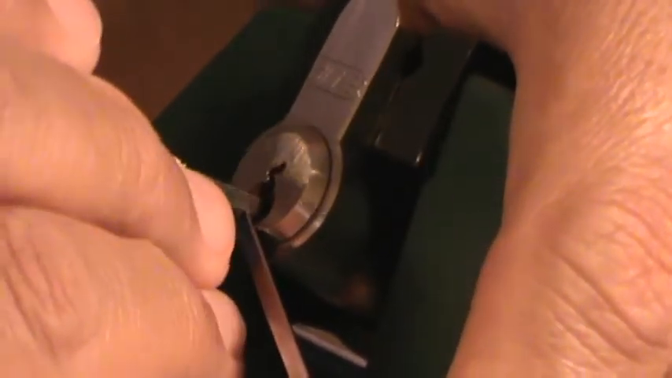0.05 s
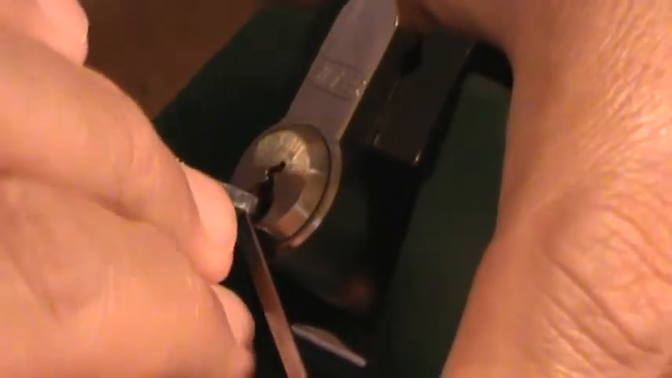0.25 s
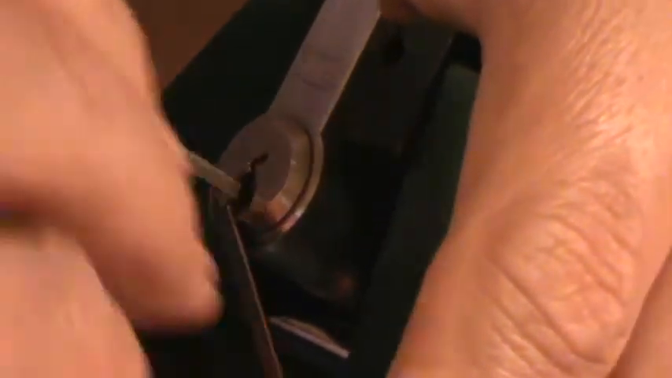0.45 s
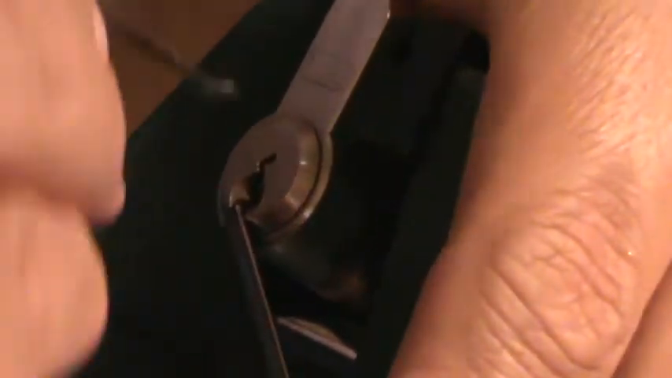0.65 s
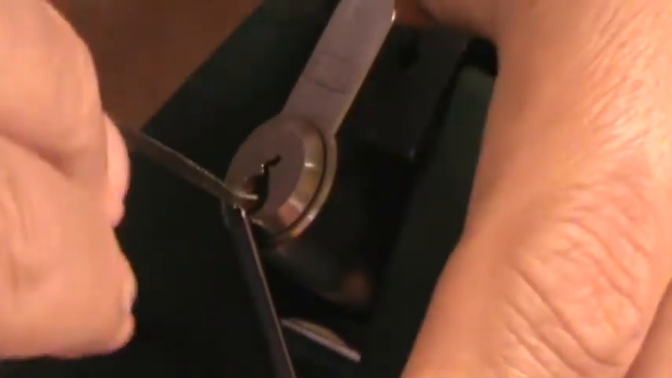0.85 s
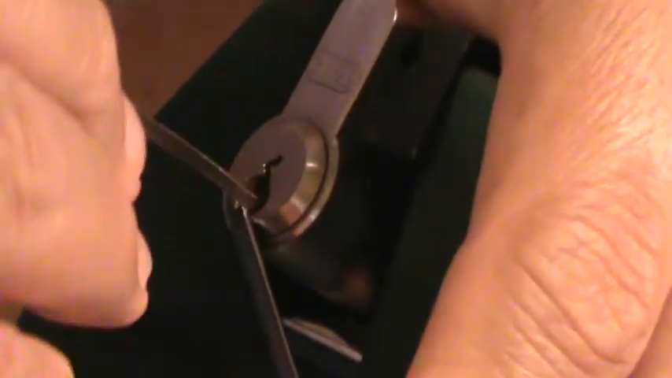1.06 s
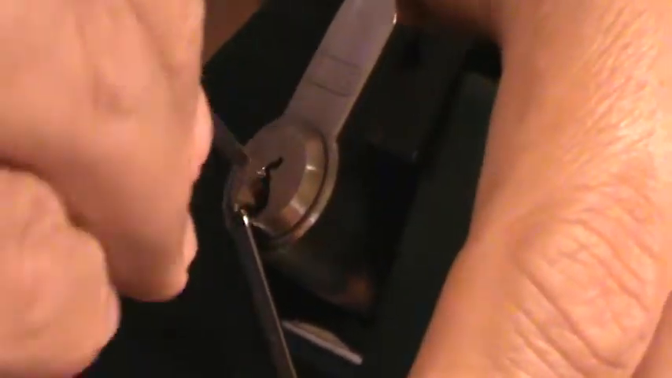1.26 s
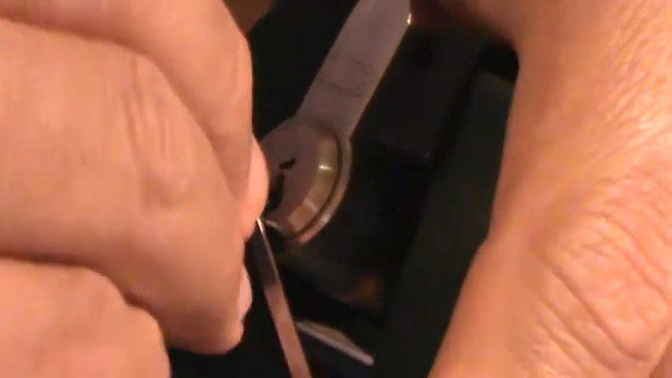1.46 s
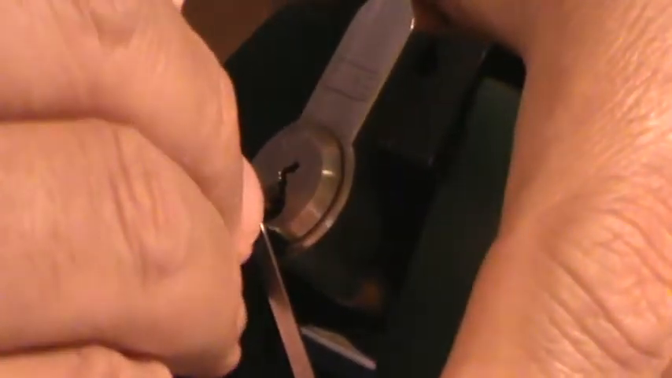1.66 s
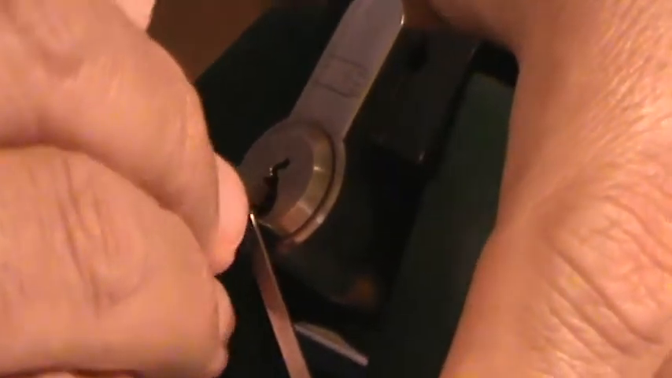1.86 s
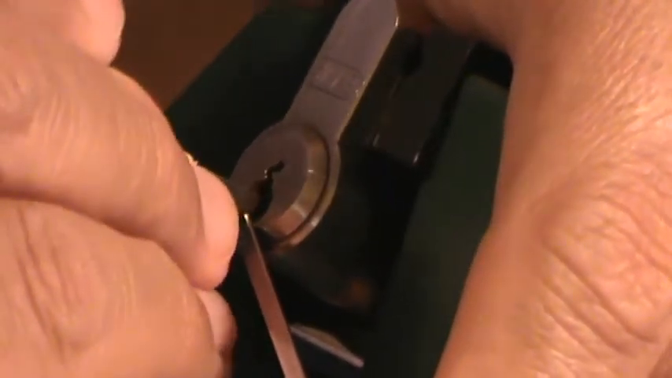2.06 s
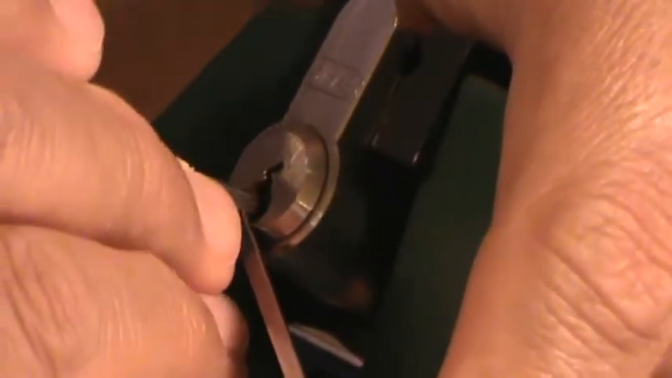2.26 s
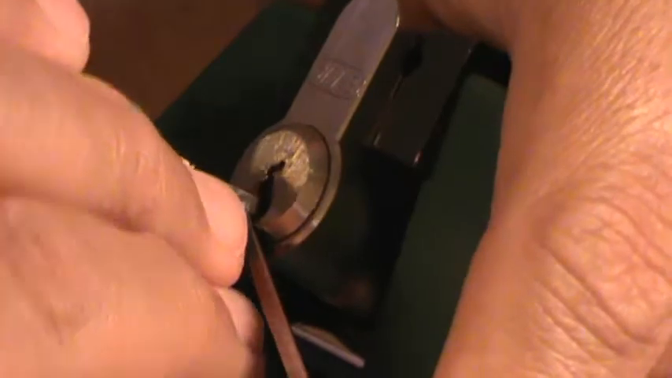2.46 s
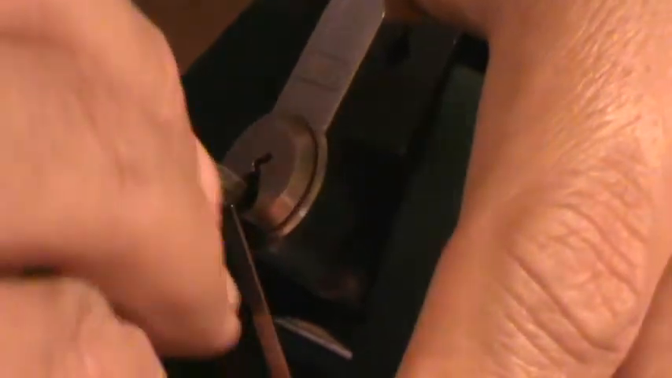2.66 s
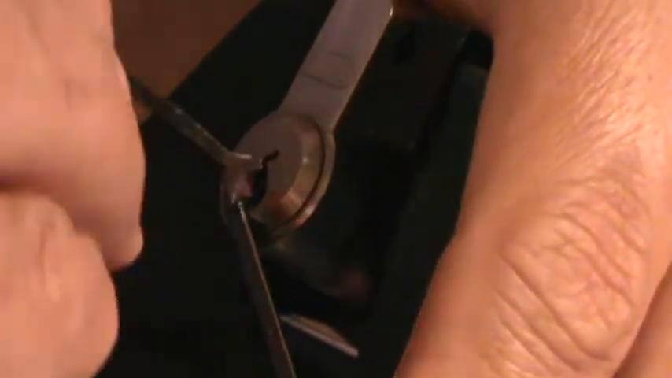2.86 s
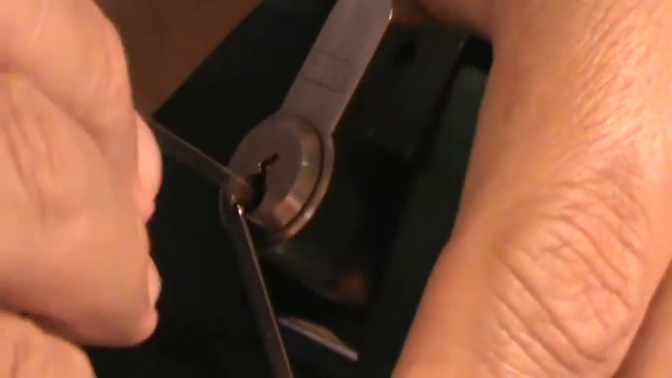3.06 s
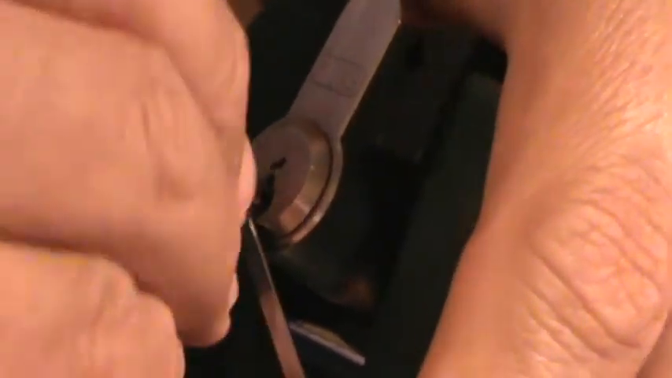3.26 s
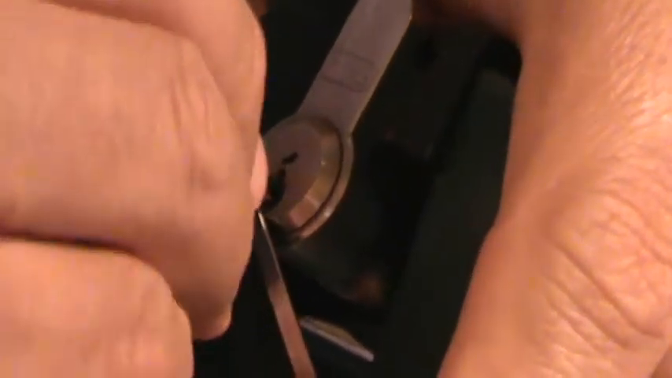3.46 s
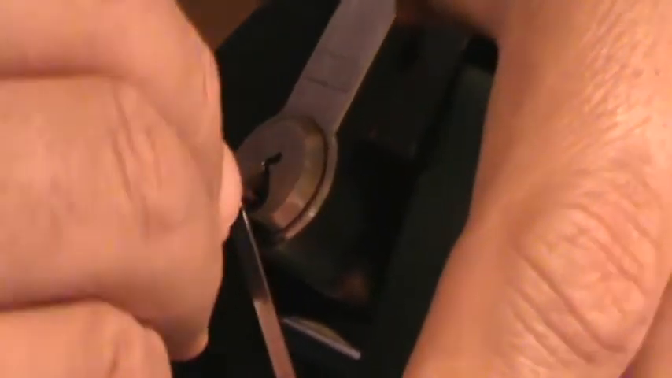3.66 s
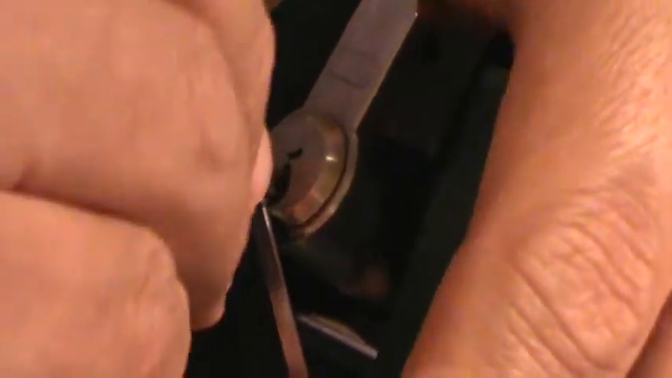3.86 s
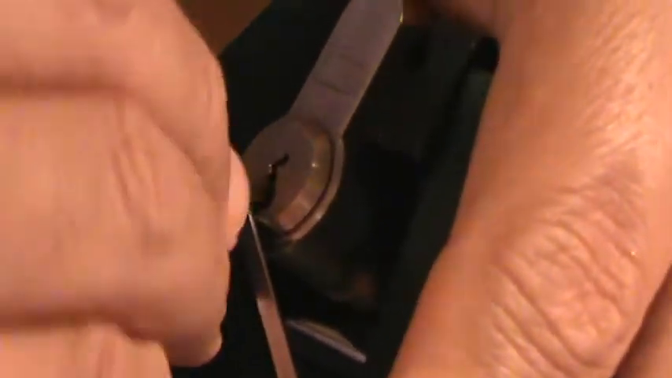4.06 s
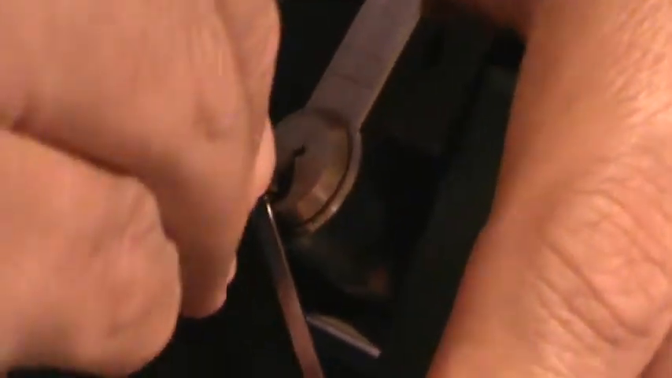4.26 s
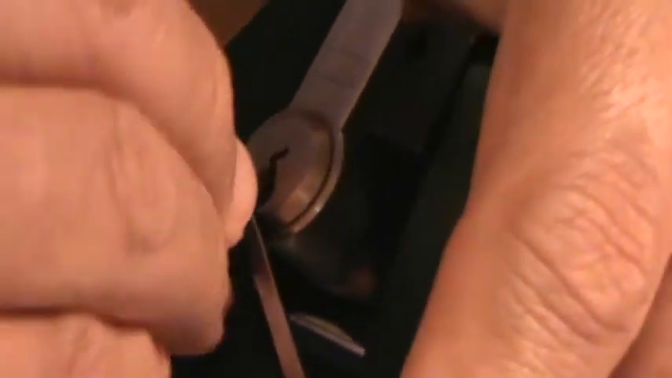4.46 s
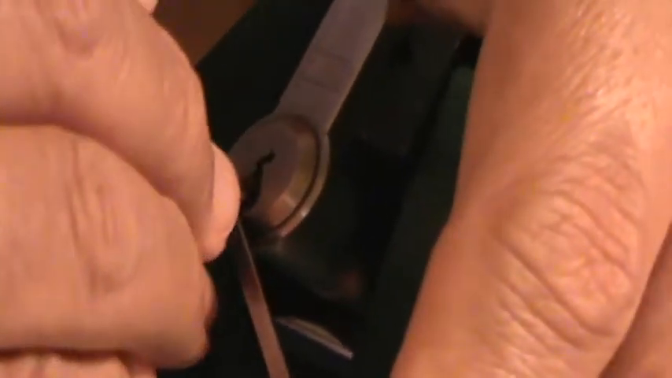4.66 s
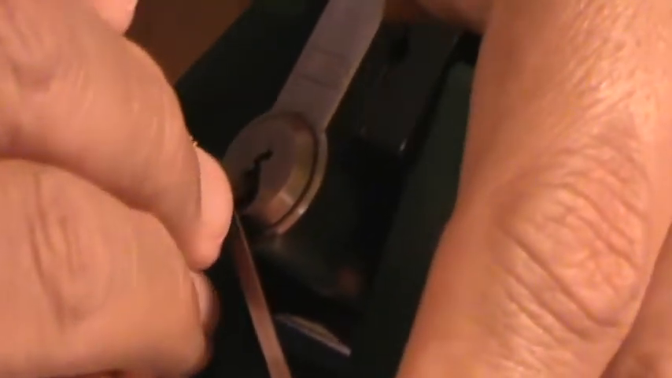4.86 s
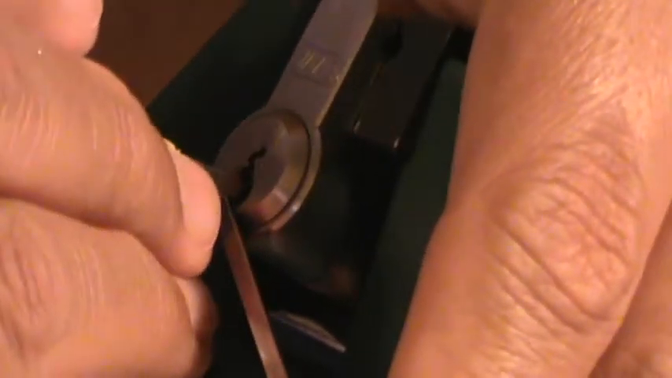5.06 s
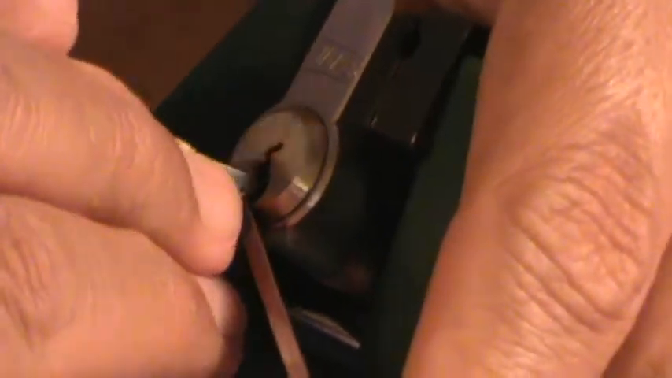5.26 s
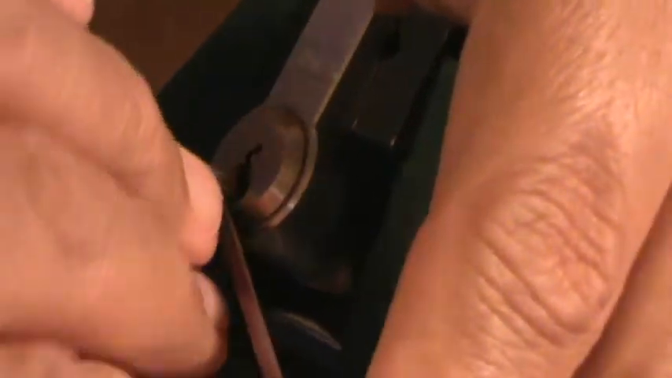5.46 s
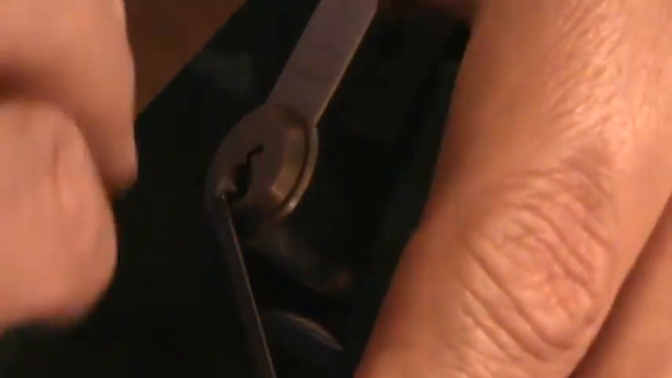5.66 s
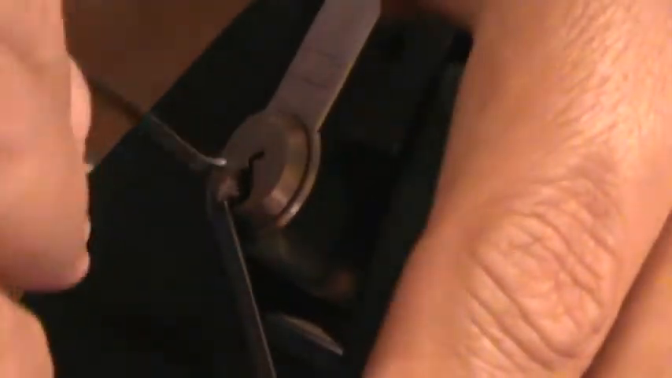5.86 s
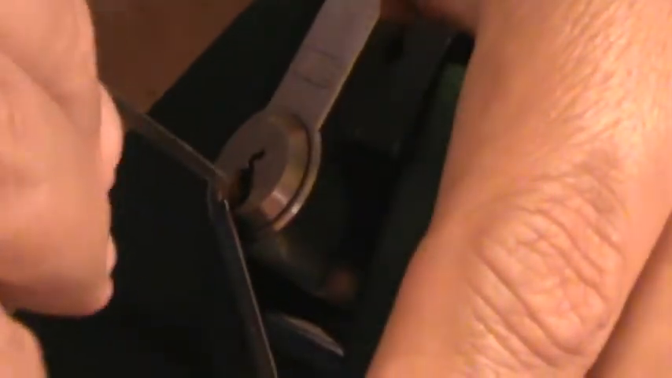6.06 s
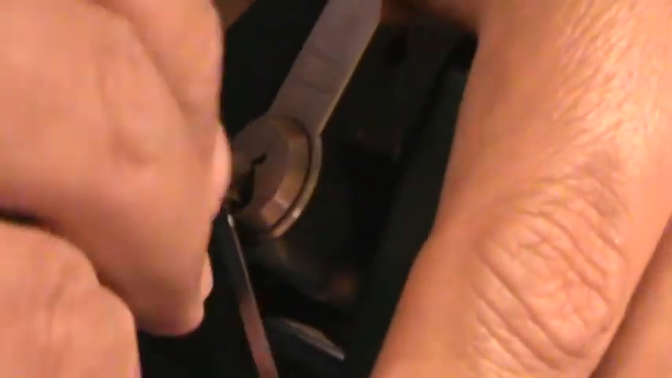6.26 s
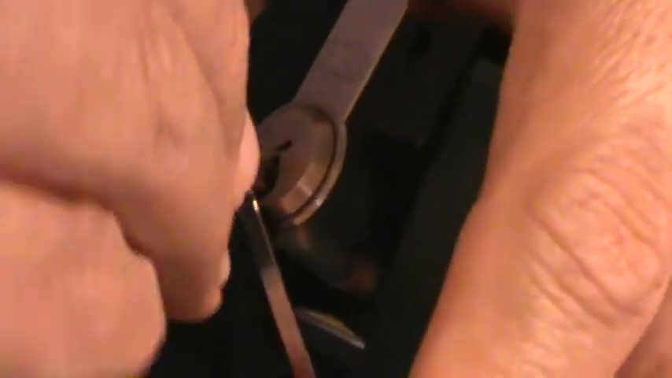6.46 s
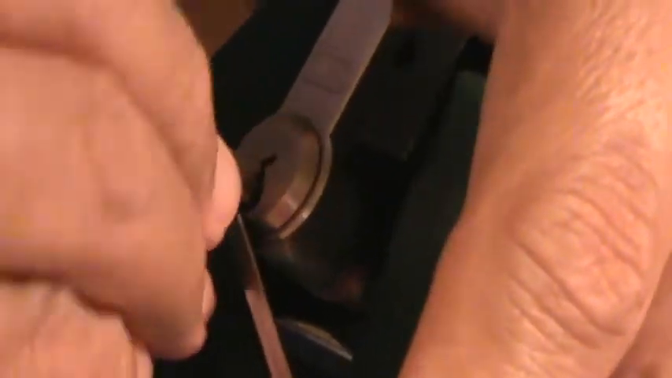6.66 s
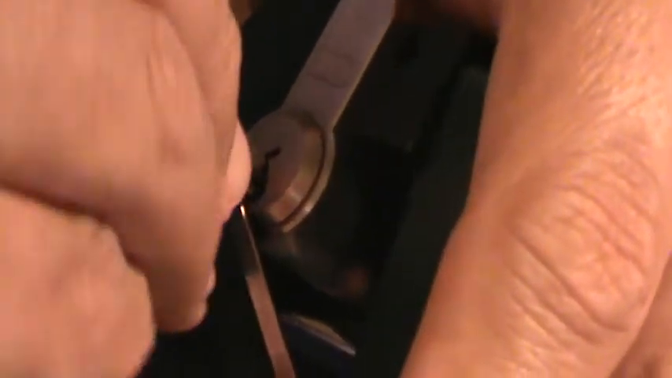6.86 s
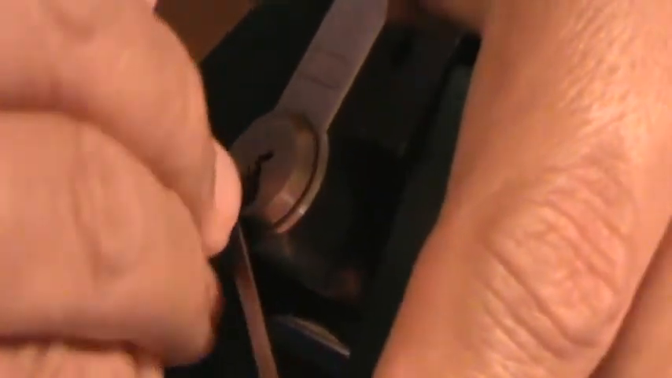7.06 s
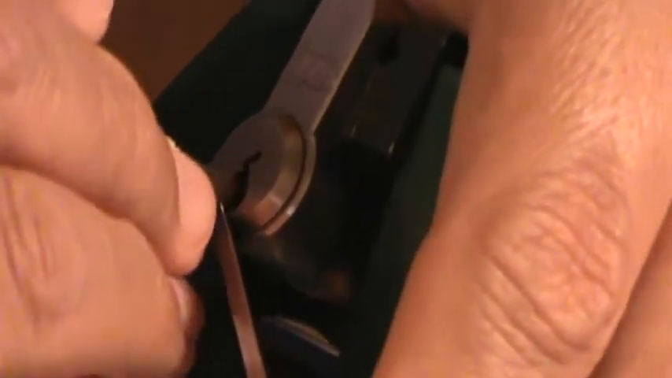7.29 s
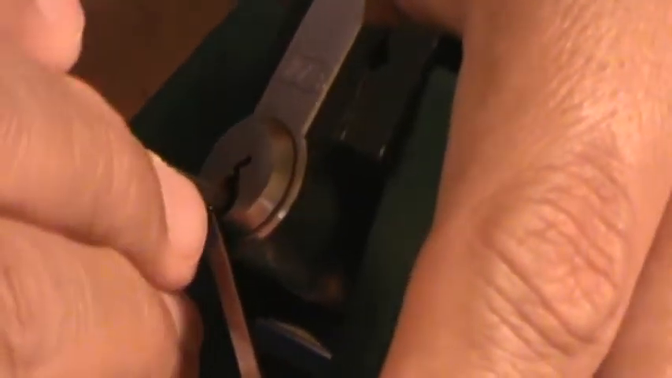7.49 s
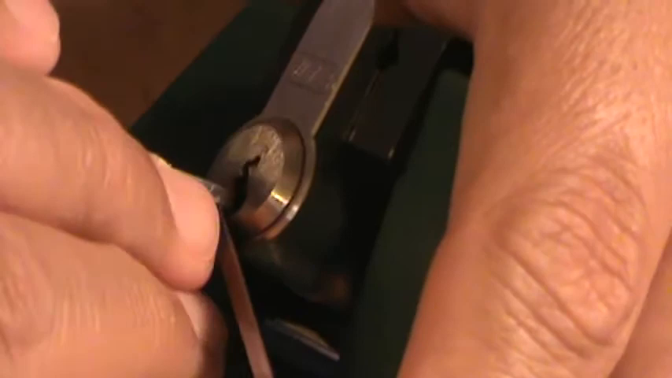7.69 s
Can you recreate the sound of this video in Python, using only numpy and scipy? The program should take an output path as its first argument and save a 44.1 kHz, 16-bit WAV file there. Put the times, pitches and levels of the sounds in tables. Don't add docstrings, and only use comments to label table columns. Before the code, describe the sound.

Tiny bright pin ticks, scratchy steel clicks and soft nudges come in irregular clusters between four sharp wrench snaps. The snaps jangle briefly and leave a short beating metallic ring, except the second, where the vice barely answers. A very brief squeak comes midway. Behind are mains hum, a distant engine drone that swells and fades, and steady microphone hiss in a small room.

```python
import sys
import numpy as np
from scipy import signal
from scipy.fft import rfft, irfft, next_fast_len
from scipy.io import wavfile
from scipy.ndimage import uniform_filter1d, map_coordinates

SR = 44100
rng = np.random.default_rng(int(sys.argv[2]) if len(sys.argv) > 2 else 0)


def to_wav(s):
    ch = np.atleast_2d(s).T
    pcm = np.round(np.clip(ch, -1, 1) * 32767)
    wavfile.write(sys.argv[1], SR, pcm.astype(np.int16))


def voltage_ratio(decibels):
    exponent = np.asarray(decibels, float) / 20
    return 10 ** exponent


N = 340893
CONTACT_SAMPLES = 12288

# (centre [Hz], width [Hz], level [dB])
PIN_MODES = [(6500, 190, 6.5), (8560, 3500, -9), (8500, 510, 11.5), (8900, 1200, 3), (10000, 990, 11),
             (11000, 250, 6), (11700, 720, 11), (13650, 610, 8), (13300, 820, 2), (10500, 5600, 5)]
TOOL_MODES = [(2640, 360, 3.5), (3864, 220, 4), (4050, 790, 7.5), (5100, 63, -29), (6260, 320, 2.5),
              (3910, 2570, 5)]
VICE_MODES = [(530, 88, -12.5), (648, 80, -3.5), (820, 115, -8), (1070, 56, -3), (1280, 360, -4.5),
              (1402, 337, -3.5), (1660, 100, -13), (1792, 36, 2.5), (1969, 54, 0.5), (2230, 270, -12.5)]
# (level [dB], t60 [s], colour blur [Hz])
DIFFUSE_TAILS = [(-9.5, 0.29, 3300), (-8, 0.36, 2500), (-5, 0.4, 120)]
PART_LAGS_S = [0, 0.000229, 0.001223]
# (centre [Hz], t60 [s], gap [Hz], partner share [0-1], level re blow [dB])
VICE_RING = [(1061, 0.2, 14, 0.4, -13.5), (1462, 0.24, 15.4, 1, -16.5), (1690, 0.19, 17, .99, -33),
             (1772, 0.24, 22.2, 1, -16.5), (2065, 0.091, 24, 0.7, -7)]

# (time [s], pins [dB], vice [dB], brightest pin [Hz], tools [dB])
WRENCH_SNAPS = [
    (0.05, -14.5, -21.5, 8500, -17),
    (2.257, -17, -39.5, 10800, -26),
    (5.224, -16, -21, 10500, -19.5),
    (7.6346, -17.5, -18.5, 13000, -21.5),
]
# (time [s], pins [dB], tools [dB], vice [dB], brightest tool [Hz])
PIN_SETS = [
    (2.4031, -38.5, -36, -42, 3270),
    (0.474, -31, -34, -39.5, 3550),
    (3.224, -38, -37, -38.5, 4060),
    (3.2545, -39.5, -37, -52, 4220),
    (3.3553, -27, -26, -39.5, 5100),
    (5.5725, -33.5, -36, -49, 3820),
    (6.504, -23.5, -29, -37, 5770),
]
# (time [s],
# pins [dB], vice [dB], brightest pin [Hz], after-rattle [dB])
TAPS = [(0.0968, -39, -42, 11200, 2), (2.2734, -36, -44.5, 11400, 10),
        (7.6383, -30, -19.5, 12000, -5), (5.2435, -32, -44, 11200, -10),
        (5.2476, -36, -38, 11800, -3), (5.2565, -37.5, -33.5, 10000, 6.5),
        (7.6615, -37, -40, 11300, -2), (7.681, -47.5, -46, 9900, -6),
        (7.6911, -20.5, -57, 7000, -13), (7.7003, -31, -46, 10600, -4), (7.718, -39, -49, 11500, -6),
        (7.7277, -38, -42, 11600, -6)]
# (time [s], pins [dB], vice [dB], brightest pin [Hz], brightest tool [Hz])
PICK_CLICKS = [(0.4543, -32, -43, 7000, 6160), (0.4703, -38, -44.5, 12000, 3700),
               (1.1184, -40, -49, 10300, 3600), (1.131, -42, -42, 6200, 6170),
               (2.6778, -30, -43, 12000, 6140), (2.6995, -37.5, -40, 7100, 3900),
               (2.7054, -40, -46, 8500, 3040), (3.2328, -36.5, -46, 11700, 3900),
               (5.5714, -30, -35, 8900, 6400), (5.6317, -43, -54, 9540, 3860),
               (6.1402, -40.5, -70, 9500, 6210), (6.2658, -40, -38.5, 8300, 4230),
               (6.2731, -40.5, -45, 12100, 4020)]
# (time [s], pins [dB], vice [dB], brightest pin [Hz])
PICK_TICKS = [(0.4662, -38, -43, 7000), (0.512, -43.5, -66, 8600), (0.5268, -46, -53, 8400),
              (0.86, -47, -57, 10000), (1.088, -54, -54, 8500), (1.1485, -52, -60, 8500),
              (1.2686, -51, -64, 9300), (1.3193, -49, -57, 8600), (1.333, -46, -65, 8600),
              (1.3446, -54, -63, 8500), (1.399, -42, -54.5, 8700), (2.74, -53, -55, 8900),
              (2.7475, -52, -63, 8900), (2.7596, -55, -57, 7040), (2.7855, -44.5, -51, 8800),
              (2.968, -46, -53, 12900), (2.978, -45, -62, 6000), (2.9995, -43, -49.5, 8550),
              (3.121, -45.5, -50, 8930), (3.1472, -44, -46, 9600), (4.3808, -55, -67, 8450),
              (5.604, -44, -63, 9700), (5.6113, -52, -58, 8900), (5.6278, -42, -61, 6680),
              (5.6599, -45.5, -50, 9600), (5.9768, -43, -54, 9700), (5.998, -45, -63, 11250),
              (6.128, -47, -46.5, 8500), (6.155, -48, -58, 8500), (6.2937, -51, -58, 11500)]
# (time
# [s], pins [dB], vice [dB], strongest vice mode [Hz])
HAND_NUDGES = [(1.1041, -52, -56, 1850), (1.139, -56, -49.5, 1000), (1.1962, -56, -44.5, 810),
               (1.264, -56, -46, 1050), (1.3117, -58, -47, 1040), (1.3277, -60, -52, 670),
               (3.102, -54, -50, 806), (3.172, -60, -52, 1840), (3.2456, -63, -46, 810),
               (3.7706, -61, -54, 1865), (2.2567, -45, -34.5, 1140), (5.5743, -43, -47, 1010),
               (6.258, -54, -49, 1886), (6.2837, -48, -45, 1060), (6.4907, -45, -38.5, 794),
               (6.4955, -59, -48, 684), (7.3796, -71, -53.5, 1390)]
# (time [s], tools [dB], vice [dB], brightest tool [Hz], after-rattle [dB])
TOOL_RUBS = [
    (0.5904, -46, -48.5, 2860, 13),
    (1.356, -54.5, -54, 4450, -8),
    (2.7182, -53, -57, 3820, -6),
    (4.1541, -49, -45, 4070, -12),
    (4.55, -56, -55, 3104, -8),
    (5.5397, -42.5, -51, 3900, 0),
    (6.2054, -56, -57, 3970, -6),
]
CONTACT_KINDS = {"snap": (2.2, 1566, -1, 0), "set": (3, 1046, -7.5, 0), "tap": (3.2, 1450, 0.1, 0.1),
                 "click": (5.5, 1020, -3, -3.5), "tick": (4, 1519, 3.5, -1.7), "nudge": (6, 1000, 5, 2.5),
                 "rub": (4.8, 750, 0.1, 0.1)}
# (time [s], slip rate [Hz], level [dB])
SQUEAK_PATH = [
    (4.4382, 1000, -66),
    (4.4428, 1100, -42.5),
    (4.445, 710, -46),
    (4.451, 580, -55),
    (4.457, 580, -47),
    (4.461, 510, -66),
]

# (centre [Hz], width [Hz], level [dB rms])
HUM_LINES = [(57.4, 7.8, -62.5), (127.6, 6.8, -64), (188.3, 6.8, -57.5), (372.3, 84, -57)]
# (time [s], firing rate [Hz], level [dB rms])
ENGINE_PATH = [(0, 82.5, -55), (1.1, 86.1, -75), (1.35, 83.6, -48.5), (1.7, 86.7, -70), (2.05, 86.9, -50),
               (2.35, 88.2, -41), (2.9, 87.5, -45), (3.36, 88.1, -47), (3.83, 85.3, -45), (4.1, 83.8, -50),
               (4.78, 81.4, -55), (5.5, 80.4, -61.5), (6.3, 81.9, -51.5), (7.73, 82, -76)]
# (frequency [Hz], density [dB/Hz])
AIR_SPECTRUM = [(15, -32), (30, -22.5), (50, -10), (150, -12.5), (250, -12.5), (320, -19), (550, -21),
                (1200, -27.5), (2100, -35.5), (2700, -45), (5000, -41)]
HISS_SPECTRUM = [(2000, -31), (5000, -40), (11000, -40.5), (15300, -37.5), (15900, -55), (16300, -70)]
# (frequency [Hz], likeness [0-1])
LIKENESS = [(60, 1), (130, 1), (290, 0.96), (640, 0.75), (1400, 0.35), (4000, 0.6), (8000, 0.35),
            (15000, 0.93)]

PIN_HZ, TOOL_HZ, TOOL_SPREAD = 9000, 4120, 0.12
SNAP_TOOL_HZ = 4650
TOWARDS_VICE = 0.24
RUB_PINS_DB = -10
SNAP_DRIES = 0.32
CLEAN_MS, CLEAN_GROWS = 3.6, 1.2
STREET_FOLLOWS = 0.043
WHISTLE_HZ = 15734


def along(points, hz):
    f, v = np.transpose(points)
    return np.interp(np.log(hz + 1), np.log(f + 1), v)


def unit(x):
    return x / np.sqrt(np.mean(x ** 2) + 1e-20)


def wobble(rate_hz):
    knots = rng.standard_normal(int(N * rate_hz / SR) + 4)
    return map_coordinates(knots, [np.arange(N) * rate_hz / SR])


def sine(phase):
    return np.sqrt(2) * np.sin(phase)


def resonance(hz, centre_hz, width_hz):
    return 1j * hz * width_hz / (centre_hz ** 2 - hz ** 2 + 1j * hz * width_hz)


def contacts():
    listed = [("snap", WRENCH_SNAPS, "s pins vice pin_hz tools"),
              ("tap", TAPS, "s pins vice pin_hz rattle"),
              ("set", PIN_SETS, "s pins tools vice tool_hz"),
              ("click", PICK_CLICKS, "s pins vice pin_hz tool_hz"),
              ("tick", PICK_TICKS, "s pins vice pin_hz"),
              ("nudge", HAND_NUDGES, "s pins vice vice_hz"),
              ("rub", TOOL_RUBS, "s tools vice tool_hz rattle")]
    found = []
    for kind, table, names in listed:
        for row in table:
            hit = dict(zip(("ms", "vice_hz", "rattle", "lift"), CONTACT_KINDS[kind]))
            hit["pin_hz"] = PIN_HZ
            hit["tool_hz"] = TOOL_HZ * np.exp(TOOL_SPREAD * rng.standard_normal())
            hit.update(zip(names.split(), row))
            hit.setdefault("pins", hit.get("tools", 0) + RUB_PINS_DB)
            vice_over_pins_db = hit["vice"] - hit["pins"]
            hit.setdefault("tools", hit["pins"] + TOWARDS_VICE * vice_over_pins_db + hit["lift"])
            if kind == "snap":
                hit["tool_hz"] = SNAP_TOOL_HZ
                hit["rattle"] -= SNAP_DRIES * vice_over_pins_db
            found.append(hit)
    columns = "s pins pin_hz tools tool_hz vice vice_hz ms rattle".split()
    return [np.array([hit[name] for hit in found]) for name in columns]


def scrape_shape(contact_ms):
    t = np.arange(2048) / SR
    life_s = np.clip(contact_ms, .3, 15)[:, None] * 5e-4
    return (1 - np.exp(-t / .00015)) * (np.exp(-t / life_s) + .14 * np.exp(-t / .007))


def struck(modes, shape, blow, scatter_db, favoured_hz, width_hz, share):
    hz = np.fft.rfftfreq(CONTACT_SAMPLES, 1 / SR)
    grit = shape * rng.standard_normal(shape.shape) * voltage_ratio(4.5 * rng.standard_normal(shape.shape))
    force = rfft(grit, CONTACT_SAMPLES) + blow * np.exp(-2j * np.pi * hz * 0.000507)
    shapes = np.array([(-1) ** k * voltage_ratio(db) * resonance(hz, centre, width)
                       for k, (centre, width, db) in enumerate(modes)])
    response = voltage_ratio(scatter_db * rng.standard_normal((len(shape), len(modes)))) @ shapes
    response = response * (share + resonance(hz, favoured_hz[:, None], width_hz))
    return force * response, response


def diffuse_tail(spectrum, response, t60_s, blur_hz):
    t = np.arange(CONTACT_SAMPLES) / SR
    blur_bins = int(blur_hz * CONTACT_SAMPLES / SR) + 1
    wash = np.sqrt(np.abs(uniform_filter1d(np.abs(response) ** 2, blur_bins, axis=1)))
    wash = wash * (np.linalg.norm(spectrum, axis=1) / np.linalg.norm(wash, axis=1))[:, None]
    fade = voltage_ratio(-60 * t / t60_s) * np.clip((t - .004) / 0.0013, 0, 1) * (t < .25)
    noise = rng.standard_normal((3, len(spectrum), CONTACT_SAMPLES))
    common, left, right = noise * fade / np.linalg.norm(fade)
    return wash * rfft(np.array([0.63 * common + 0.5 * left, 0.47 * common + 0.63 * right]))


def lock():
    s, pins_db, pin_hz, tools_db, tool_hz, vice_db, vice_hz, contact_ms, rattle_db = contacts()
    hz = np.fft.rfftfreq(CONTACT_SAMPLES, 1 / SR)
    shape = scrape_shape(contact_ms)
    clean = (CLEAN_MS / contact_ms[:, None]) ** CLEAN_GROWS
    # (spectrum and response, level [dB], samples over which the level holds)
    parts = [(struck(PIN_MODES, shape, clean * 3.4, 2.0, pin_hz, 1600, 0.74), pins_db - 1.0, 130),
             (struck(TOOL_MODES, shape, clean * 3.6, 1.8, tool_hz, 500, 0.64), tools_db - 1.5, 130),
             (struck(VICE_MODES, shape, clean * 3.15, 1.23, vice_hz, 330, 0.44), vice_db - 3.0, 260)]
    heard = 0
    for part, (wet_db, t60_s, blur_hz), lag_s in zip(parts, DIFFUSE_TAILS, PART_LAGS_S):
        (spectrum, response), db, head = part
        spectrum = spectrum * np.exp(-2j * np.pi * hz * lag_s)
        start = irfft(spectrum, CONTACT_SAMPLES)[:, :head]
        spectrum = spectrum * (voltage_ratio(db) / np.sqrt(np.mean(start ** 2, 1)))[:, None]
        tail = diffuse_tail(spectrum, response, t60_s, blur_hz)
        heard = heard + spectrum + voltage_ratio(wet_db + rattle_db)[:, None] * tail
    hands = np.array([1 + .25 * np.exp(-2j * np.pi * hz * .0009),
                      1 + .3 * np.exp(-2j * np.pi * hz * .0014)])
    sounds = irfft(heard * hands[:, None], CONTACT_SAMPLES)
    out = np.zeros((2, N + CONTACT_SAMPLES))
    for start, sound in zip(np.round(s * SR).astype(int), sounds.transpose(1, 0, 2)):
        out[:, start:start + CONTACT_SAMPLES] += sound
    return out[:, :N] * voltage_ratio([[-.8], [.6]])


def vice_ring():
    out = np.zeros((2, N + CONTACT_SAMPLES))
    t = np.arange(CONTACT_SAMPLES) / SR
    swell = 1 - np.exp(-t / 0.00076)
    for s, _, blow_db, *_ in WRENCH_SNAPS:
        start = round(s * SR)
        for hz, t60_s, gap_hz, share, db in VICE_RING:
            wander = np.cumsum(rng.standard_normal(CONTACT_SAMPLES)) * 0.018 + rng.normal(0, 0.22, (2, 1))
            upper = np.sin(2 * np.pi * (hz + gap_hz / 2) * t + wander)
            lower = np.sin(2 * np.pi * (hz - gap_hz / 2) * t + wander)
            decay = voltage_ratio(blow_db + db - 60 * t / t60_s)
            out[:, start:start + CONTACT_SAMPLES] += decay * swell * (upper + share * lower)
    return out[:, :N]


def squeak_throat(hz):
    low = resonance(hz, 2300, 600) * resonance(hz, 1900, 900)
    high = resonance(hz, 3180, 800) * resonance(hz, 3100, 900)
    return np.abs(low) + np.abs(high)


def squeak():
    s, rate_hz, db = np.transpose(SQUEAK_PATH)
    first, last = round(s[0] * SR), round(s[-1] * SR)
    t = np.arange(first, last) / SR
    slips_hz = np.interp(t, s, rate_hz)
    phase = 2 * np.pi * np.cumsum(slips_hz) / SR
    tone = sum(squeak_throat(k * slips_hz) * np.sin(k * phase) for k in range(1, 9))
    out = np.zeros(N)
    out[first:last] = voltage_ratio(np.interp(t, s, db)) * tone
    return out


def stereo_noise(gain):
    size = next_fast_len(N)
    hz = np.fft.rfftfreq(size, 1 / SR)
    turn = np.arccos(np.clip(along(LIKENESS, hz), 0, 1)) / 2
    spectra = rfft(rng.standard_normal((2, size))) * gain(hz) * [np.cos(turn), np.sin(turn)]
    mid, side = irfft(spectra, size)[:, :N]
    return np.array([mid + side, mid - side])


def hums():
    t = np.arange(N) / SR
    lines = 0
    for centre_hz, width_hz, db in HUM_LINES:
        line = stereo_noise(lambda hz: np.abs(resonance(hz, centre_hz, width_hz)) ** 2)
        lines = lines + voltage_ratio(db) * unit(line)
    mains = voltage_ratio(-49.0 + 0.41 * wobble(1.7)) * sine(2 * np.pi * 119.8 * t + 0.83 * wobble(8))
    whistle = voltage_ratio(-65) * sine(2 * np.pi * WHISTLE_HZ * t)
    return lines + mains + whistle


def engine():
    s, firing_hz, db = np.transpose(ENGINE_PATH)
    t = np.arange(N) / SR
    phase = 2 * np.pi * np.cumsum(np.interp(t, s, firing_hz)) / SR + 0.52 * wobble(6)
    return voltage_ratio(np.interp(t, s, db) + 2.1 * wobble(5.49)) * sine(phase)


def background():
    s, _, engine_db = np.transpose(ENGINE_PATH)
    street_db = STREET_FOLLOWS * (engine_db - engine_db.mean())
    air = stereo_noise(lambda hz: voltage_ratio(along(AIR_SPECTRUM, hz) - 17) * (hz < 9000))
    air = air * voltage_ratio(np.interp(np.arange(N) / SR, s, street_db)) * voltage_ratio([[-.3], [.3]])
    hiss = stereo_noise(lambda hz: voltage_ratio(along(HISS_SPECTRUM, hz) - 18))
    return air + hiss


def scene():
    return lock() + vice_ring() + squeak() + hums() + engine() + background()


def roll_off(x):
    return signal.sosfilt(signal.butter(12, 17000, fs=SR, output="sos"), x)


def record(dry):
    size = next_fast_len(N + 4096)
    rolloff = [(15000, -0.5), (16000, -9), (16600, -33), (17200, -60)]  # (Hz, dB)
    top = voltage_ratio(along(rolloff, np.fft.rfftfreq(size, 1 / SR)))
    mix = irfft(rfft(dry, size) * top, size)[:, :N]
    return roll_off(mix)


dry = scene()
out = record(dry)
to_wav(out)
```